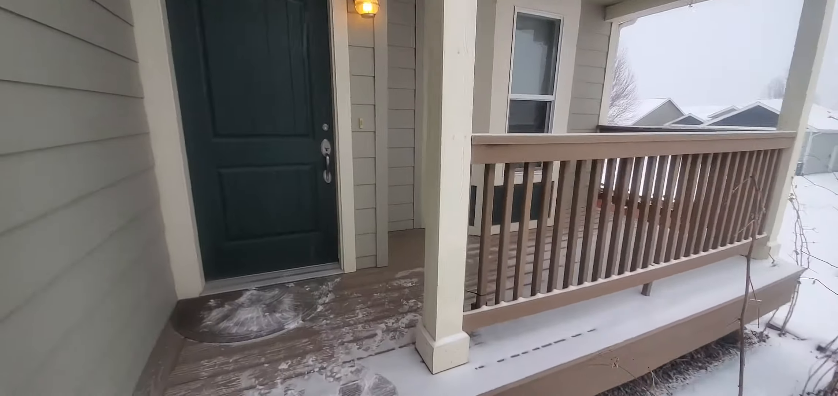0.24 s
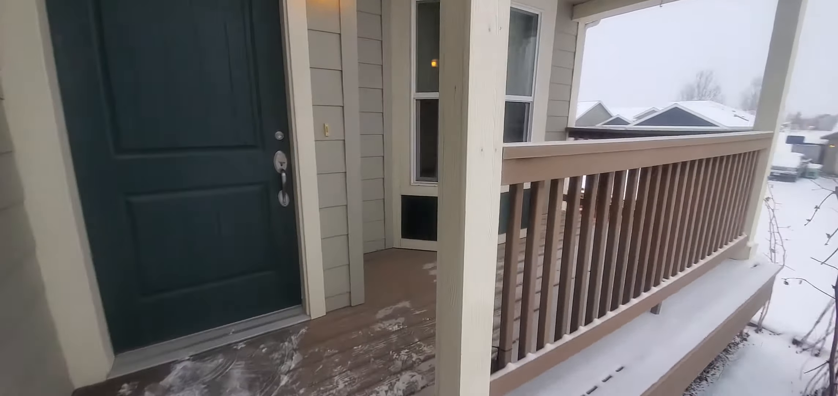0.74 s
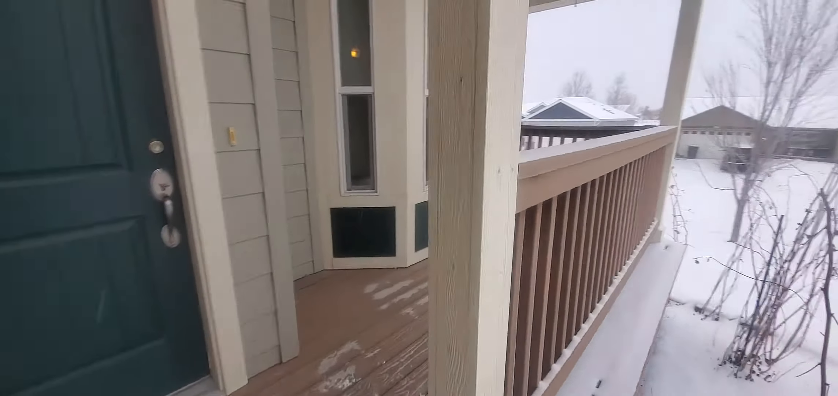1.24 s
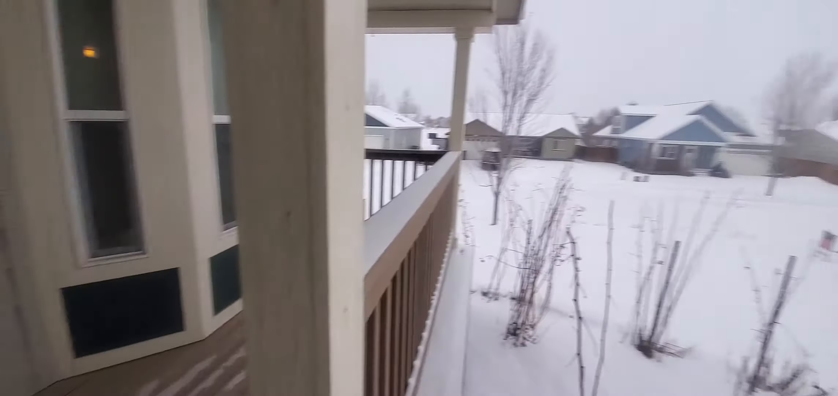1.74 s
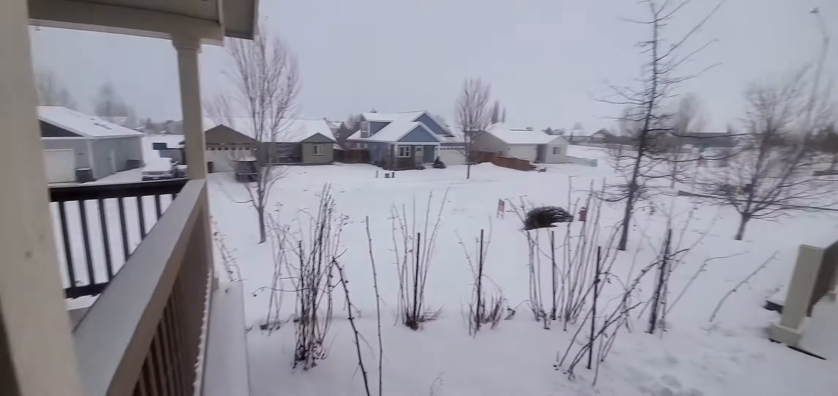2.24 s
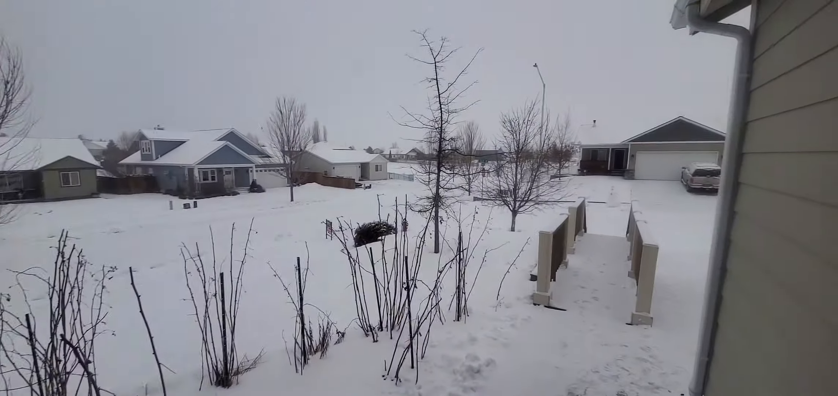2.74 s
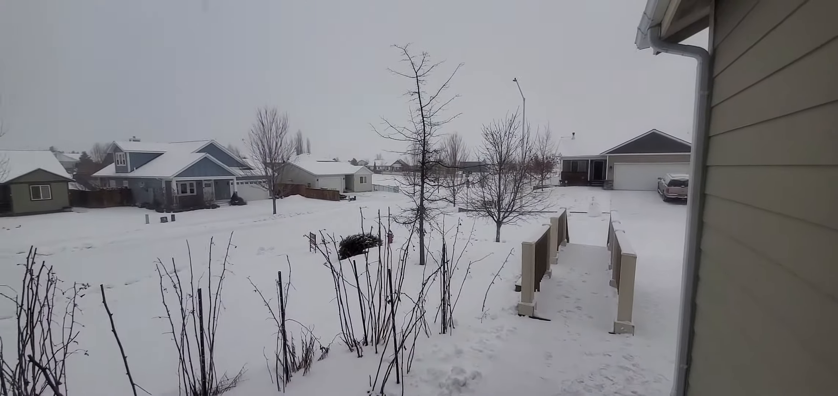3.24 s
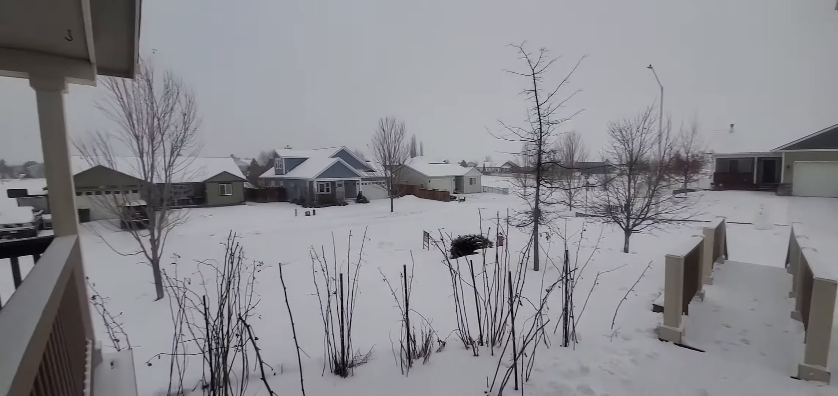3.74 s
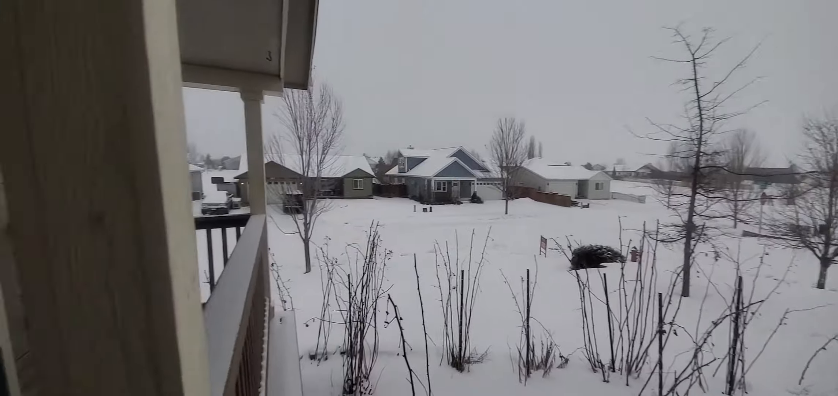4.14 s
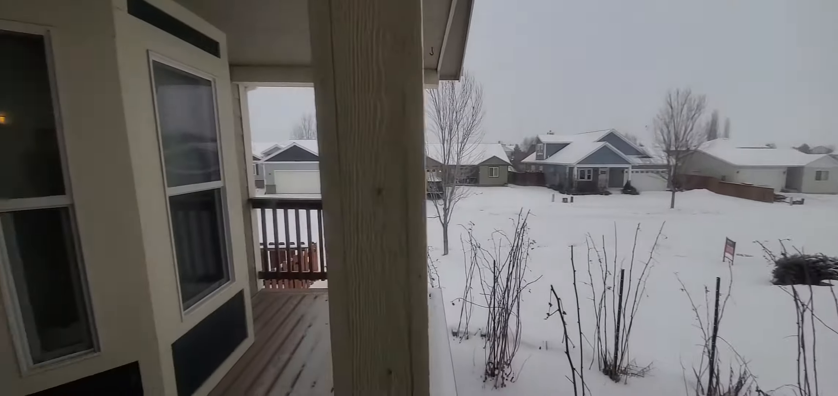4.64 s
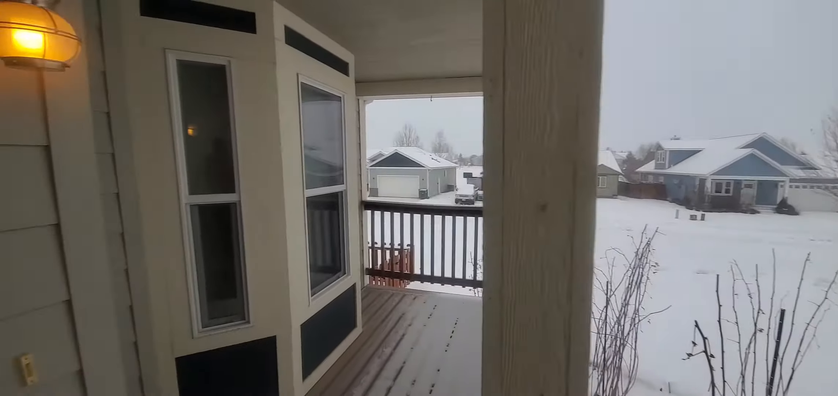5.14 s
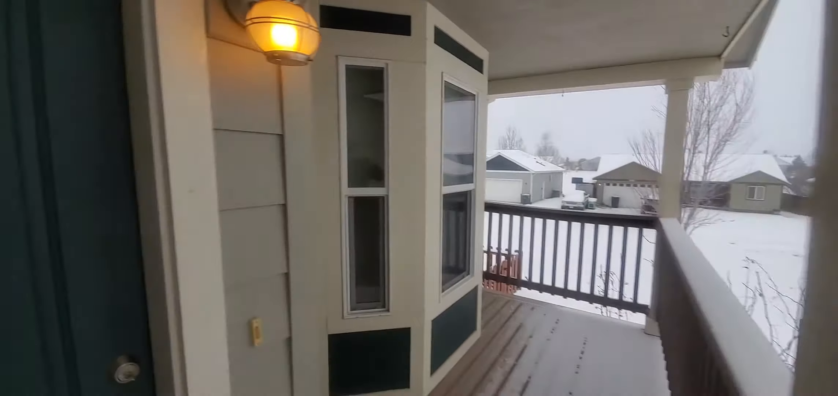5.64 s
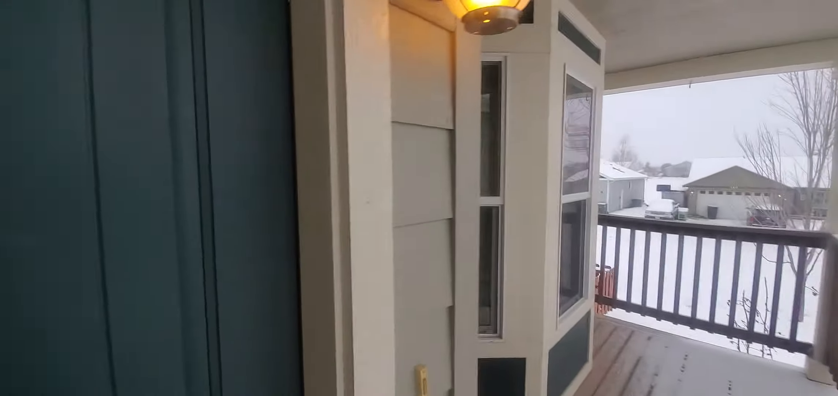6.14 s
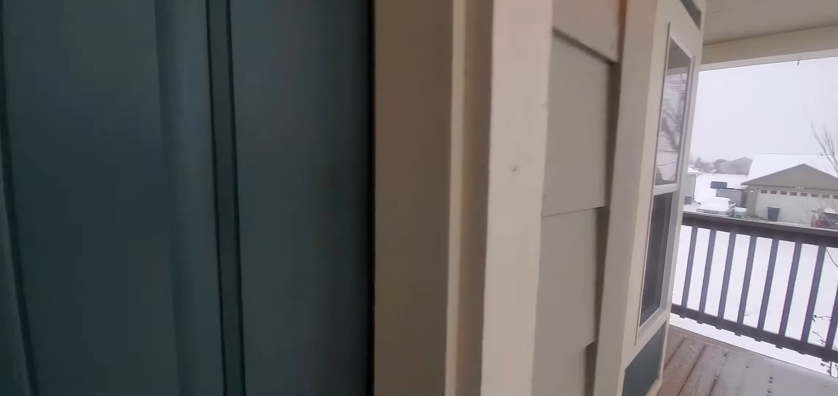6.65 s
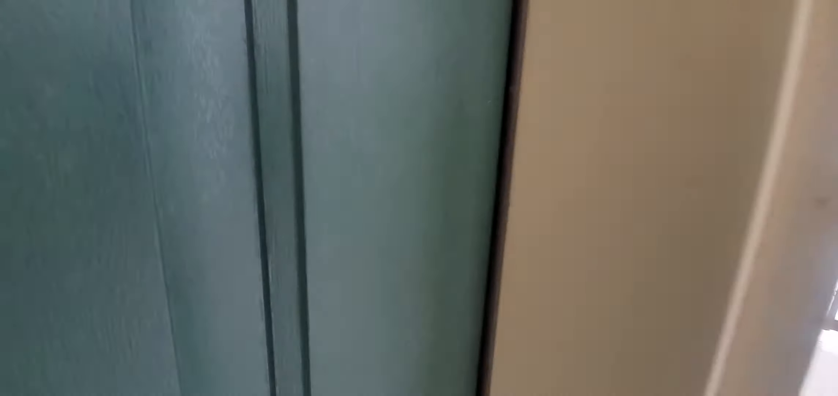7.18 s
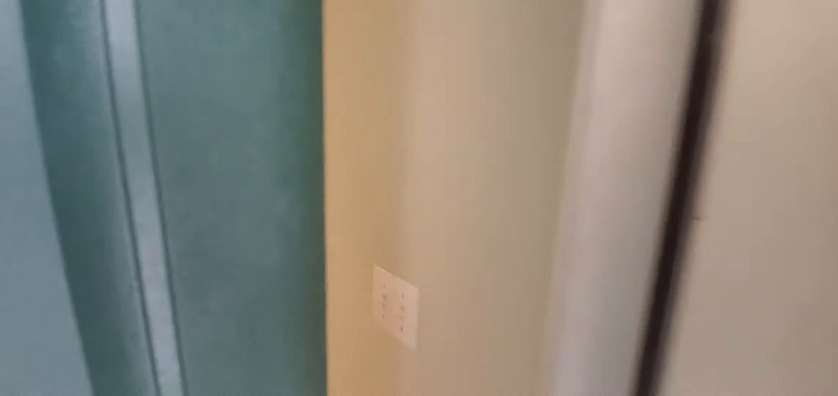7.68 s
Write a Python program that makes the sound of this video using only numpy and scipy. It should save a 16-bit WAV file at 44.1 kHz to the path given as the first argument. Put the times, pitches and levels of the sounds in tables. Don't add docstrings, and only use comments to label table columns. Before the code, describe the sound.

Boots crunch and snap through thin snow on a wooden porch, two heavy stamps thud, then a door latch clacks open and soft steps go in.

```python
import sys
import numpy as np
from scipy import signal
from scipy.fft import rfft, irfft, next_fast_len
from scipy.io import wavfile
from scipy.ndimage import map_coordinates

SR = 44100
rng = np.random.default_rng(int(sys.argv[2]) if len(sys.argv) > 2 else 0)


def level_to_linear(level):
    exponent = np.asarray(level, float) / 20
    return 10 ** exponent


def persist_wave(psi):
    counts = np.round(np.clip(psi, -1, 1) * 32767).astype(np.int16)
    wavfile.write(sys.argv[1], SR, np.atleast_2d(counts).T)


N = 348988
EDGE_DB = 11


def white():
    return rng.standard_normal((2, N))


def unit(x):
    return x / np.sqrt(np.mean(x ** 2) + 1e-20)


def seconds_axis(seconds):
    return np.arange(int(seconds * SR)) / SR


def sine(hz, t):
    return np.sin(2 * np.pi * hz * t)


def decay(t, t60):
    return level_to_linear(-60 * t / t60)


def onset(t, attack):
    return 1 - np.exp(-t / attack)


def along(points, hz):
    f, v = np.transpose(points)
    return np.interp(np.log(hz + 1), np.log(f + 1), v)


def curves(rows):
    s, *cols = np.transpose(rows)
    return [np.interp(np.arange(N) / SR, s, c) for c in cols]


def wobble(rate):
    at = np.arange(N) * rate / SR
    return np.array([map_coordinates(rng.standard_normal(int(at[-1]) + 4), [at]) for _ in range(2)])


def filtered(x, response):
    m = next_fast_len(x.shape[-1] + 4096, True)
    return irfft(rfft(x, m) * response(np.fft.rfftfreq(m, 1 / SR)), m)[..., :x.shape[-1]]


# pitch_hz, likeness_0_to_1
PORT_LIKENESS = [(130, 0.18), (290, 1), (640, 0.44), (1400, 0.027), (3100, 0.046), (7000, 0.013)]


def rush(spectrum, pair):
    turn = lambda hz: np.arccos(np.clip(along(PORT_LIKENESS, hz), -1, 1)) / 2
    colour = lambda hz: level_to_linear(along(spectrum, hz)) * [np.cos(turn(hz)), np.sin(turn(hz))]
    mid, side = filtered(pair, colour)
    return unit(np.array([mid + side, mid - side])) * np.sqrt(2)


def grainy(rate, spread_db, share):
    sizes = level_to_linear(spread_db * np.minimum(rng.exponential(size=N), 2.5))
    hits = (rng.random(N) < rate / SR) * sizes
    grains = signal.lfilter([1], [1, -.98], hits) * white()
    share = np.clip(share, 0, 1)
    return np.sqrt(share) * unit(grains) + np.sqrt(1 - share) * white()


def burst(spectrum, t60, attack, seconds=0.32):
    t = seconds_axis(seconds)
    noise = unit(filtered(rng.standard_normal((2, len(t))), lambda hz: level_to_linear(along(spectrum, hz))))
    return noise * decay(t, t60) * onset(t, attack)


def swells(rows, gains, rest_db, shape):
    t = np.arange(0, N + 64, 64) / SR
    bumps = np.array([level_to_linear(-EDGE_DB * np.abs((t - s) / half) ** shape) for s, half, *_ in rows])
    power = np.asarray(gains) ** 2 @ bumps ** 2 + level_to_linear(rest_db) ** 2
    return np.interp(np.arange(N) / SR, t, np.sqrt(power))


def add(track, s, sound):
    i = round(s * SR)
    track[:, i:i + sound.shape[-1]] += sound[..., :track.shape[1] - i]


def pan(db):
    return level_to_linear(np.array([db / 2, -db / 2]))


# pitch_hz, level_db_per_hz
AIR_SPECTRUM = [(59, -0.5), (100, 5.5), (155, -16), (290, -11), (521, -19.5), (1000, -26), (2400, -42.5),
                (6540, -52), (8000, -70.5), (17600, -120)]


def winter_air():
    return level_to_linear(-56.5 + 1.3 * wobble(2.58)[0]) * rush(AIR_SPECTRUM, white())


# time_s, level_db
ENGINE_LEVEL = [(2.3, -82), (2.9, -72), (3.15, -73.5), (3.8, -70.5), (4.4, -73), (4.7, -84)]


def far_engine():
    spectrum = [(420, -47), (530, 8.5), (600, -4.0), (680, 3), (850, -33.5)]
    return level_to_linear(curves(ENGINE_LEVEL)[0]) * rush(spectrum, white())


# pitch_hz, t60_s
PORCH_T60 = [(400, 0.41), (1600, 0.35), (4000, 0.25), (12000, 0.14)]


def porch(x):
    hz, t, z = signal.stft(rng.standard_normal((2, SR // 2)), SR, nperseg=256)
    tail = signal.istft(z * decay(t, along(PORCH_T60, hz)[:, None]), SR, nperseg=256)[1]
    return signal.fftconvolve(x, tail / np.linalg.norm(tail[0]), axes=1)[:, :N]


# centre_s, half_length_s, level_db
GRIP_JOLTS = [(0.247, 0.11, -41.5), (0.66, 0.42, -45.5), (1.2, 0.3, -42.5), (1.494, 0.24, -41.5),
              (1.892, 0.16, -33), (2.227, 0.075, -44), (2.45, 0.033, -38.5), (2.575, 0.11, -39),
              (2.822, 0.22, -47), (3.093, 0.043, -39), (3.384, 0.1, -45.5), (3.693, 0.098, -38),
              (3.903, 0.1, -51.5), (4.355, 0.14, -45), (4.695, 0.27, -55), (5.262, 0.095, -37),
              (5.396, 0.066, -37), (5.705, 0.009, -50), (5.912, 0.077, -50.5), (6.392, 0.067, -42),
              (6.822, 0.19, -45.5), (7.274, 0.15, -40), (7.555, 0.16, -41), (7.895, 0.28, -40.5)]
# pitch_hz, level_db_per_hz
GRIP_SPECTRUM = [(12, -44), (20, -34), (54, 2), (125, -9.5), (211, -18.5), (357, -29), (500, -32.5),
                 (650, -59), (1100, -120)]
# time_s, left_minus_right_db
PALM_BALANCE = [(.3, 8.5), (1.7, 3), (3.6, 11.5), (5.4, 7), (5.75, 7), (7.4, 3)]


def grip_rumble():
    jolts = swells(GRIP_JOLTS, level_to_linear([row[2] for row in GRIP_JOLTS]), rest_db=-59, shape=1.02)
    hold = jolts * pan(curves(PALM_BALANCE)[0])
    lumps = level_to_linear(3.66 * wobble(22)) * filtered(white(), lambda hz: level_to_linear(along(GRIP_SPECTRUM, hz)))
    return level_to_linear(4.0) * hold * unit(lumps)


# start_s, peak_db, pitch_hz
FINGER_BUMPS = [(0.266, -33, 91.5), (0.393, -28.5, 91), (0.551, -35.5, 91), (0.756, -31.5, 96.9),
                (1.114, -31, 285), (1.314, -26.5, 230), (1.415, -32, 91.5), (1.472, -30, 220),
                (1.886, -25, 91.5), (2.023, -29, 138), (2.422, -37, 90.5), (3.088, -38, 89.5),
                (3.342, -38, 300), (3.4, -34, 94.2), (3.429, -36, 215), (3.45, -26, 180), (3.68, -30, 90),
                (3.646, -28, 91), (3.891, -41, 91.5), (4.372, -32, 132), (4.524, -41, 110),
                (4.573, -34.5, 91.5), (4.666, -46, 242), (4.91, -43, 261), (5.002, -39, 250),
                (5.052, -33.5, 256), (5.216, -27.5, 196)]


def finger_bumps():
    out, t = np.zeros((2, N)), seconds_axis(.1)
    palm_s, palm_db = np.transpose(PALM_BALANCE)
    for s, db, hz in FINGER_BUMPS:
        push = -sine(hz, t) * np.exp(-t * hz / 0.81) * onset(t, 0.0011)
        add(out, s, level_to_linear(db + 1.5) * pan(np.interp(s, palm_s, palm_db))[:, None] * push)
    return out


# centre_s, half_length_s, crunch_db, boards_db
STEPS_TABLE = [(.01, 0.065, -50, -48), (0.192, 0.097, -41.5, -47), (0.482, 0.23, -55.5, -67),
               (0.704, .11, -46.5, -46.5), (1.133, 0.22, -50.5, -51), (1.221, 0.05, -37.5, -46),
               (1.297, 0.094, -41.5, -45.5), (1.507, 0.07, -61, -49.5), (1.808, 0.14, -46.5, -41.5),
               (1.933, 0.1, -39.5, -42), (2.43, 0.015, -65, -56), (2.531, 0.026, -45.5, -68.5),
               (2.757, 0.055, -59, -46), (2.837, 0.014, -72, -40), (2.91, 0.038, -60, -42.5),
               (3.039, 0.024, -62, -39.5), (3.45, 0.097, -75, -51), (3.65, 0.15, -66, -53),
               (3.825, 0.05, -62, -56), (4.34, 0.1, -52, -44.5), (4.622, 0.15, -65, -51.5),
               (4.982, 0.34, -79, -53.5), (5.201, 0.069, -51, -44.5), (5.409, 0.027, -53, -37),
               (5.485, 0.083, -54, -42.5), (5.674, 0.017, -83, -48.5), (5.879, 0.097, -55.5, -57),
               (6.423, 0.23, -63, -63.5), (7.283, 0.14, -59.5, -52), (7.61, 0.13, -63.5, -53)]


def step_swells(column, rest_db):
    return swells(STEPS_TABLE, level_to_linear(np.transpose(STEPS_TABLE)[column]), rest_db, shape=2.3)


def snow_crush():
    return step_swells(2, rest_db=-90.5)


# time_s, level_db
ARM_LEVEL = [(0, -61.5), (.4, -62.5), (.65, -55), (1.4, -54.5), (1.6, -60), (2.0, -57), (2.35, -64.5),
             (2.8, -59.5), (3.2, -67), (3.45, -57.5), (3.95, -58.5), (4.25, -67.5), (5.05, -65.5),
             (5.45, -60), (6.2, -58), (6.5, -55), (7.05, -61), (7.9, -59.5)]
# pitch_hz, level_db_per_hz
COAT_SPECTRUM = [(3000, -100), (6000, -28), (7500, -56.5), (8150, -11.5), (10800, -1.5), (12300, 3),
                 (15700, -4), (16100, -33)]
# time_s, level_db
CLOTH_LEVEL = [(0, -72), (.9, -71), (2.05, -72.5), (2.25, -83.5), (2.65, -73), (2.95, -83), (3.2, -94),
               (3.45, -74.5), (3.95, -75.5), (4.2, -77), (4.65, -77), (4.9, -82.5), (5.6, -77),
               (6.1, -75.5), (7.0, -78), (7.9, -77)]
# pitch_hz, level_db_per_hz
SWISH_SPECTRUM = [(600, -30), (900, -5.5), (1400, -4.5), (1900, 0), (2650, -5), (3500, -29)]


def coat():
    sleeve = np.hypot(level_to_linear(curves(ARM_LEVEL)[0] + 2.0), level_to_linear(-11.5) * snow_crush())
    flutter = level_to_linear(1.5 * wobble(30)[0]) * pan(5.3)[:, None]
    rustle = sleeve * flutter * rush(COAT_SPECTRUM, grainy(rate=67, spread_db=6.5, share=0.086))
    swish = level_to_linear(curves(CLOTH_LEVEL)[0] + 3 * wobble(20)[0]) * rush(SWISH_SPECTRUM, white())
    return rustle + swish


# start_s, peak_db
FOLD_TICKS = [(0.604, -36), (1.707, -36), (1.7474, -36), (1.806, -34), (2.7621, -37), (2.999, -39.5),
              (3.128, -39.5), (5.642, -41), (6.303, -41), (6.66, -41), (6.689, -37), (6.699, -37),
              (7.535, -38)]


def coat_ticks():
    out = np.zeros((2, N))
    for s, db in FOLD_TICKS:
        tick = burst(COAT_SPECTRUM, t60=0.009, attack=0.00026, seconds=0.015)
        add(out, s, level_to_linear(db + 1.0) * pan(6.8)[:, None] * tick)
    return out


# time_s, level_db
SEAL_LEVEL = [(7.09, -110), (7.12, -68), (7.2, -61), (7.4, -59), (7.55, -54), (7.65, -64), (7.8, -67)]


def door():
    seal = [(500, -3.0), (900, 0.5), (1250, -7), (1700, 2), (2200, -11.0), (3000, -88), (5000, -68)]
    return level_to_linear(curves(SEAL_LEVEL)[0]) * rush(seal, white())


# start_s, peak_db, mid_db, low_db, left_minus_right_db
LATCH_CLICKS = [
    (6.8117, -31.5, -25, -15, -1.5),
    (6.8672, -20.5, -31.5, -21.5, -0.5),
    (7.094, -26.5, -13, -7, 2),
    (7.1033, -4.5, -23.5, -27.5, 4),
    (7.2514, -35, -12, -13, 0),
    (7.5424, -25, -25, -23.5, -0.5),
    (7.5903, -32.5, -16, -9, -4.5),
    (7.731, -42, -27, -34, 3),
    (7.8586, -39, -27, -20, 1),
]
# pitch_hz, level_db
LATCH_TINES = [(4300, -17), (5050, -11), (6300, -7), (7600, -16), (11500, 5)]
# start_s, level_db, t60_s
LATCH_RINGS = [
    (6.875, -60, 0.089),
    (7.11, -55, .2),
    (7.547, -46, 0.06),
]


def latch():
    out, t = np.zeros((2, N)), seconds_axis(.1)
    for s, db, mid_db, low_db, pan_db in LATCH_CLICKS:
        low = [(300, low_db + 19.5), (900, low_db + 9.0), (2000, low_db + 11.0)]
        mid = [(3000, mid_db), (5500, mid_db + 4.5), (7500, mid_db - 4)]
        shape = low + mid + [(9500, -6.5), (12500, 0.0), (15500, -7.0)]
        click = burst(shape, t60=0.037, attack=0.0012, seconds=.1)
        add(out, s, level_to_linear(db - 0.5) * pan(pan_db)[:, None] * click)
    for s, db, t60 in LATCH_RINGS:
        ring = np.zeros((2, len(t)))
        for hz, g in LATCH_TINES:
            gain = level_to_linear(g + 2.5 * rng.standard_normal((2, 1)))
            ring += gain * np.sin(2 * np.pi * (hz * t + rng.random((2, 1))))
        add(out, s, level_to_linear(db) * decay(t, t60) * np.cos(np.pi / 2 * t / t[-1]) * ring)
    return out


# time_s, level_db
GLOVE_LEVEL = [(5.36, -100), (5.375, -62), (5.4, -62), (5.43, -64.5), (5.445, -50.5), (5.47, -44),
               (5.5, -51.5), (5.52, -77), (5.6, -110)]


def finger():
    out, t = np.zeros((2, N)), seconds_axis(.1)
    spike = 1.48 * onset(t, .00008) * np.exp(-(t / 0.00055) ** 2)
    after = np.maximum(t - .0007, 0)

    def swing(hz, t60, turn):
        return np.sin(2 * np.pi * (hz * after + turn)) * decay(t, t60) * onset(after, 0.0011)

    left = .95 * spike - .75 * swing(165, .03, 0) - .45 * swing(80, .09, .2)
    right = -.6 * np.roll(spike, shift=1) + .45 * swing(210, .03, 0) + .06 * swing(80, .09, .2)
    add(out, 5.36, np.array([left, right]))
    add(out, 5.412, swing(227, 0.047, 0) * [[.2], [.03]])
    glove = [(500, -5), (1200, -0.5), (2500, -0.5), (3500, 5.5), (5000, -5.0), (7000, -24.5)]
    return out + level_to_linear(curves(GLOVE_LEVEL)[0]) * rush(glove, white())


# centre_s, half_length_s, level_db, pitch_hz
DRAGS = [(.19, .05, -55, 800), (0.199, .05, -49.5, 1500), (.69, .05, -47, 1030), (1.092, .04, -48.5, 1090),
         (1.226, .04, -38, 920), (1.208, .035, -40, 1380), (1.21, .03, -47, 1960), (1.38, .03, -49, 1360),
         (1.977, .035, -43.5, 2100), (1.975, .03, -49.5, 3260), (4.375, .03, -47, 850),
         (4.37, .035, -48.5, 524), (4.33, .06, -56, 1800), (5.156, .012, -50.5, 830),
         (5.151, .012, -56, 1750), (5.229, .03, -55.5, 780), (5.859, .04, -51.5, 950),
         (5.516, .03, -55, 660), (6.86, .012, -48, 880), (6.874, .012, -43, 1020), (6.883, .012, -48, 1550),
         (3.43, .15, -64, 10900), (3.65, .13, -65, 10600), (3.66, .15, -66, 12600), (3.55, .15, -72, 2400)]


def scrapes():
    out = np.zeros((2, N))
    for s, half, db, hz in DRAGS:
        u = np.arange(-2, 2, 1 / (half * SR))
        judder = np.interp(u, np.linspace(-2, 2, 30), rng.standard_normal(30))
        rough = rng.standard_normal((3, len(u))) * level_to_linear(4.2 * judder)
        width_hz = min(hz * 0.14, 450)
        resonance = lambda f: (1j * f / (hz * hz - f * f + 1j * f * width_hz)) ** 2
        sung = filtered(rough[0] + 1.4 * rough[1:], resonance)
        add(out, s - 2 * half, level_to_linear(db - EDGE_DB * 0.92 * u ** 2) * unit(sung))
    return out


# pitch_hz, level_db_per_hz
BOARD_SPECTRUM = [(100, -49), (180, -1.5), (260, 0.5), (400, -8), (600, -12.5), (1200, -70.5)]


def boards():
    weight = step_swells(3, rest_db=-75)
    return weight * level_to_linear(-6 + 3.0 * wobble(40)[0]) * rush(BOARD_SPECTRUM, white())


def crystals(rate, hz, spread_db):
    u = rng.random((int(rate * N / SR), 4))
    t = np.arange(256) / SR
    pitch = hz * np.exp(0.24 * rng.standard_normal((len(u), 1)))
    size = level_to_linear(spread_db * np.minimum(-np.log(u[:, 1:2]), 3))
    grain = size * sine(pitch, t) * np.exp(-t * pitch / 2.2) * (1 - np.exp(-t * pitch * 4))
    at = ((u[:, :1] * N).astype(int) + np.arange(len(t))).ravel()
    sides = (np.cos(u[:, 2:3] * np.pi / 2), np.sin(u[:, 2:3] * np.pi / 2))
    return unit(np.array([np.bincount(at, (grain * g).ravel(), N + len(t))[:N] for g in sides])) * np.sqrt(2)


# pitch_hz, level_db_per_hz
SNOW_SPECTRUM = [(290, -18.5), (500, 0.5), (974, -3), (1230, -10.5), (1410, -10.5), (3410, -15),
                 (4540, -29.5), (7800, -42.5), (17200, -120)]


def snow_crunch():
    powder = level_to_linear(-6.5) * rush(SNOW_SPECTRUM, grainy(rate=450, spread_db=5, share=0.53))
    grains = level_to_linear(-8.5) * crystals(rate=500, hz=1592, spread_db=3.0)
    return snow_crush() * level_to_linear(2.6 * wobble(35)[0]) * (powder + grains)


# start_s, peak_db, pitch_hz
STEP_SNAPS = [(0.053, -39, 942), (0.109, -43, 1180), (0.119, -37.5, 1160), (0.174, -34, 802),
              (0.187, -32, 1320), (0.213, -32.5, 1770), (0.251, -33, 899), (0.266, -43, 1640),
              (0.324, -36.5, 1740), (0.352, -37, 856), (0.381, -37, 1940), (0.405, -41, 851),
              (0.431, -45, 1450), (0.452, -46, 837), (0.476, -37, 1440), (0.495, -40, 802),
              (0.509, -40, 1040), (0.544, -32.5, 1490), (0.628, -46, 988), (0.648, -36.5, 894),
              (0.695, -40, 1180), (0.708, -36.5, 1020), (0.767, -37, 845), (0.863, -38, 780),
              (0.991, -30.5, 1300), (1.052, -42, 818), (1.073, -37, 1300), (1.084, -36, 1080),
              (1.112, -28, 1050), (1.127, -37, 1540), (1.142, -30.5, 802), (1.153, -33, 824),
              (1.194, -37, 1460), (1.206, -26, 830), (1.229, -25, 975), (1.336, -40, 1110),
              (1.372, -32.5, 1540), (1.612, -43, 890), (1.634, -38, 1010), (1.659, -30, 1580),
              (1.685, -36, 1450), (1.705, -29.5, 1530), (1.73, -35, 1280), (1.747, -28.5, 1700),
              (1.768, -36, 802), (1.79, -31.5, 2500), (1.806, -26, 1340), (1.823, -32.5, 953),
              (1.84, -26.5, 1050), (1.868, -30, 1800), (1.896, -23.5, 1470), (1.945, -32, 1560),
              (1.97, -28, 1730)]
# start_s, peak_db, pitch_hz
HEEL_SNAPS = [(2.5177, -36, 1740), (2.152, -49.5, 1310), (2.368, -51, 800), (2.42, -54, 905),
              (2.605, -48, 1880), (2.682, -50, 1830), (2.696, -52, 1850), (2.737, -47, 1900),
              (2.747, -49, 1750), (2.754, -47, 1500), (2.776, -47, 1950), (2.866, -46, 1900),
              (2.923, -49.5, 2300), (2.8159, -36.5, 1790), (2.86, -48, 1880), (2.89, -37, 1790),
              (2.918, -47, 1730), (3.0181, -41, 1880), (3.435, -57, 1980), (3.7801, -39, 1821),
              (3.83, -50, 1900), (4.1284, -48, 980), (4.2117, -50, 1150), (4.243, -43.5, 1160),
              (4.3264, -42, 960), (4.358, -37, 1028), (4.5172, -51, 1290), (4.5968, -41, 1300),
              (4.664, -45, 1560), (4.7397, -47, 1420), (4.855, -58, 1500), (4.9112, -46, 1020),
              (4.997, -56.5, 1600), (5.0448, -43.5, 1200), (5.131, -46.5, 1020), (5.1993, -53, 980),
              (5.2171, -41, 1460)]


def crust():
    out, t = np.zeros((2, N)), seconds_axis(.05)
    click_spectrum = [(300, -2), (900, 11.5), (2500, 1.0), (3800, -13.5), (5000, -45), (7500, -27), (12000, -5.5)]
    snaps = [(s, db - 3, hz, -4) for s, db, hz in STEP_SNAPS]
    pivots = [(s, db, hz, 1) for s, db, hz in HEEL_SNAPS]
    for s, db, hz, board_db in snaps + pivots:
        phase = [[0], [rng.uniform(0, 1.64)]]
        ring = np.sin(2 * np.pi * hz * t + phase) * decay(t, 0.015) * onset(t, 0.00016)
        edge = level_to_linear(-10.5) * sine(1.6 * hz, t) * decay(t, 0.008) * onset(t, 0.00055)
        click = level_to_linear(2.0) * burst(click_spectrum, t60=0.014, attack=0.00068, seconds=.05)
        board = level_to_linear(board_db - 4.0) * burst(BOARD_SPECTRUM, t60=0.064, attack=0.00074, seconds=.05)[0]
        add(out, s, level_to_linear(db) * (ring + edge + click + board))
    return out


# start_s, level_db, pitch_hz, life_cycles
PLANK_KNOCKS = [(5.75, -12, 209, 4.5), (5.748, -24, 670, 6), (5.76, -33, 525, 12.6), (5.77, -24, 145, 8.6),
                (6.248, -23, 767, 6.8), (6.246, -26, 2300, 13), (6.246, -34, 3050, 12),
                (6.262, -31, 1750, 12), (6.27, -23, 202, 16.4), (6.26, -28.5, 330, 15.5),
                (6.69, -31, 830, 5), (7.12, -38, 810, 14), (6.7, -25, 275, 9.3), (6.705, -28, 680, 6),
                (6.686, -27, 1310, 5.8), (6.704, -28, 620, 7), (7.103, -16.5, 142, 6.1),
                (7.11, -30, 520, 8.7), (7.26, -28.5, 150, 6.9), (5.365, -22, 280, 3.5),
                (7.772, -37, 250, 3.1)]


def plank_knocks():
    out, t = np.zeros((2, N)), np.arange(SR // 3) / SR
    for s, db, hz, life in PLANK_KNOCKS:
        note = sine(hz, t) * np.exp(-t * hz / life) * onset(t, 0.0022)
        add(out, s, level_to_linear(db) * note * np.ones((2, 1)))
    return out


# start_s, peak_db, panel_db, crack_db, t60_s
BOOT_STAMPS = [
    (5.744, 1, -21.5, -15.5, 0.11),
    (6.245, 0.5, -18.5, -16.5, 0.12),
    (6.685, -13.5, -9, -17, 0.071),
    (6.7, -6.5, -17.5, -19, 0.093),
    (7.101, -10.5, -10, -8, 0.073),
    (7.253, -10.5, -18, -32, 0.067),
    (7.287, -18, -24, -31, 0.18),
    (7.77, -26, -24, -20, 0.081),
    (7.886, -22, -31, -24, 0.078),
]
# start_s, level_db, pitch_hz
STAMP_TOES = [
    (5.727, -19.5, 329),
    (6.231, -20, 330),
]
# pitch_hz, level_db
JOIST_MODES = [(72, -18.5), (86, 0.5), (104, -16)]
# pitch_hz, level_db, t60_s
PANEL_MODES = [(141.5, 1.5, 0.35), (204.6, -0.5, 0.51), (257, -7, 0.41), (330, -6.5, 0.39),
               (392, -11.5, 0.25), (658, -15, 0.25)]
# pitch_hz, level_db_per_hz
SHUDDER_SPECTRUM = [(30, -23), (55, 0), (80, 7), (110, -6.5), (150, -12), (250, -25), (500, -61.5)]
# pitch_hz, level_db_per_hz
CRACK_SPECTRUM = [(240, -32.5), (400, 2.5), (570, -7), (780, -3), (1120, -11.5), (1720, -7), (2750, -19.5),
                  (3710, -26), (6940, -54), (9000, -31.5), (11700, -27), (19800, -120)]


def stamps():
    low, high, t = np.zeros((2, N)), np.zeros((2, N)), seconds_axis(.5)

    def drift():
        return np.interp(t, np.linspace(0, .5, 22), rng.standard_normal(22))

    slap = sine(1620, t) * decay(t, 0.023) + level_to_linear(-8.5) * sine(780, t) * decay(t, 0.031)
    slap = slap[:SR // 4] * [[.3], [1]]
    for s, db, panel_db, crack_db, t60 in BOOT_STAMPS:
        joist = sum(level_to_linear(g) * sine(hz, t - .0095) for hz, g in JOIST_MODES)
        joist = joist * decay(t, t60) * onset(t, 0.0088) ** 2
        shudder = level_to_linear(-18.5) * burst(SHUDDER_SPECTRUM, t60=0.78, attack=0.046, seconds=.5)[0]
        panel = np.zeros(len(t))
        for hz, g, d in PANEL_MODES:
            level = level_to_linear(g - 2.0 + 3.2 * drift()) * decay(t, d)
            panel += level * np.sin(2 * np.pi * (hz * t + rng.random() + 0.2 * drift()))
        add(low, s - .004, level_to_linear(db + 5.5) * joist)
        add(low, s, level_to_linear(db) * shudder + level_to_linear(db + panel_db - 2.5) * panel * onset(t, 0.0064))
        grit = level_to_linear(-8.5) * burst(CRACK_SPECTRUM, t60=0.13, attack=0.0053, seconds=.25)
        crack = burst(CRACK_SPECTRUM, t60=0.044, attack=0.0016, seconds=.25) + grit + slap
        add(high, s + 0.002016, level_to_linear(db + crack_db - 1.0) * pan(-0.63)[:, None] * crack)
    for s, db, hz in STAMP_TOES:
        add(low, s, -level_to_linear(db) * decay(t, 0.097) * (sine(hz, t) + 0.17 * sine(190, t)))
        add(high, s, level_to_linear(db - 8.5) * burst(CRACK_SPECTRUM, t60=0.15, attack=0.016))
    return low, high


def scene():
    low, high = stamps()
    metal, tap = latch(), finger()
    snaps = crust() + coat_ticks()
    sent = level_to_linear(-12.5) * high + level_to_linear(-9.5) * metal + level_to_linear(-9.5) * snaps + level_to_linear(-22.5) * low
    echo = porch(sent + level_to_linear(-41.5) * np.diff(tap, prepend=0) * 10)
    background = winter_air() + far_engine() + echo
    handling = grip_rumble() + finger_bumps() + coat() + tap
    doorway = door() + metal
    feet = scrapes() + boards() + snow_crunch() + snaps + plank_knocks() + low + high
    return background + handling + doorway + feet


def roll_off(x):
    return signal.sosfilt(signal.butter(12, 16790, fs=SR, output="sos"), x)


def record(dry):
    bass_cut = lambda hz: (1j * hz / 45) ** 2 / (1 + 1.3j * hz / 45 - (hz / 45) ** 2)
    top_cut = lambda hz: level_to_linear(-22 * np.clip((hz - 15800) / 300, 0, 1)) * (hz < 16750)
    wet = filtered(dry, lambda hz: bass_cut(hz) * top_cut(hz))
    return roll_off(np.clip(wet, -.99, .99))


dry = scene()
out = record(dry)
persist_wave(out)
```